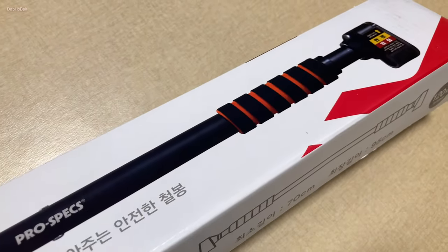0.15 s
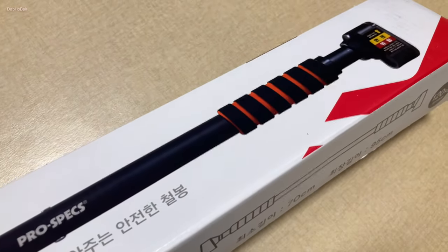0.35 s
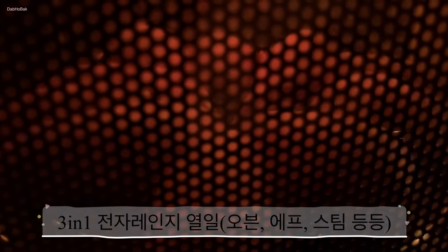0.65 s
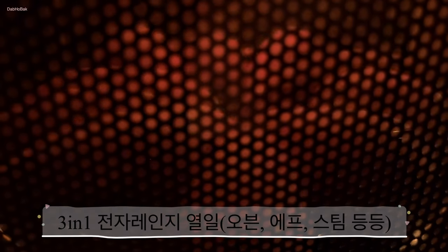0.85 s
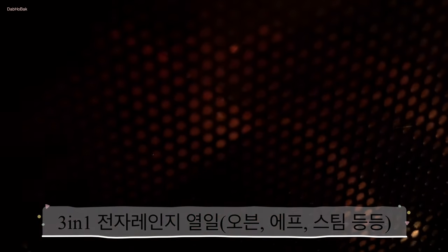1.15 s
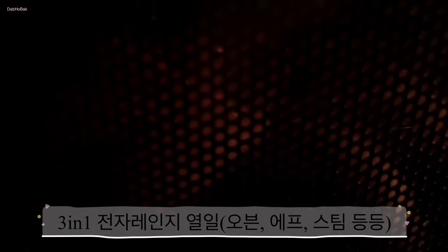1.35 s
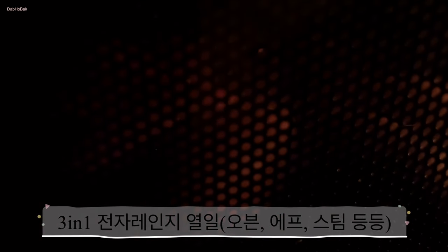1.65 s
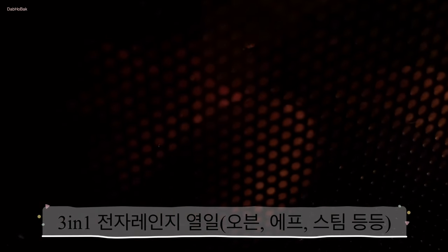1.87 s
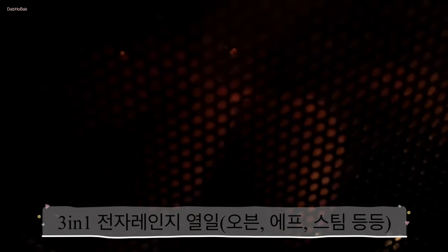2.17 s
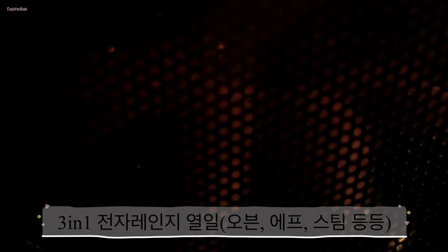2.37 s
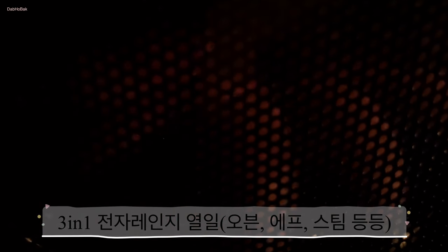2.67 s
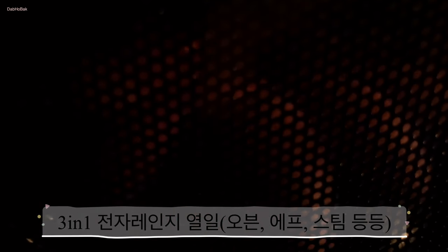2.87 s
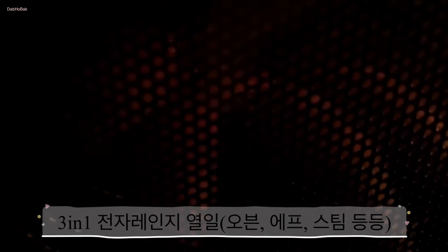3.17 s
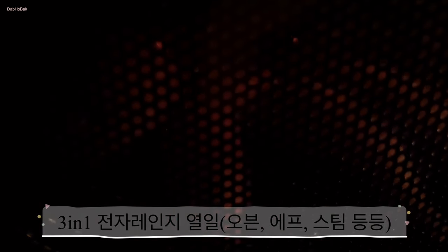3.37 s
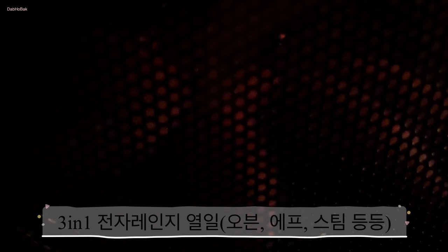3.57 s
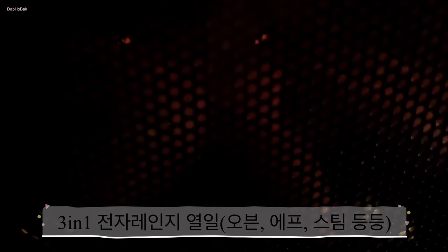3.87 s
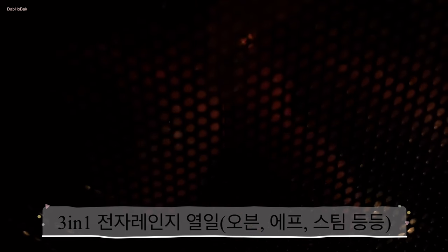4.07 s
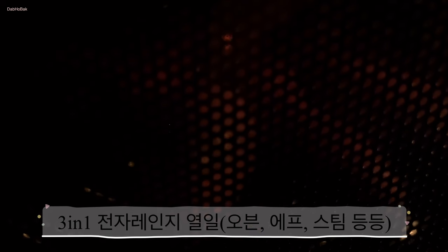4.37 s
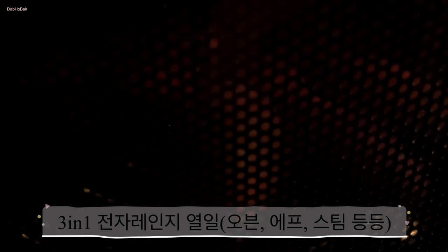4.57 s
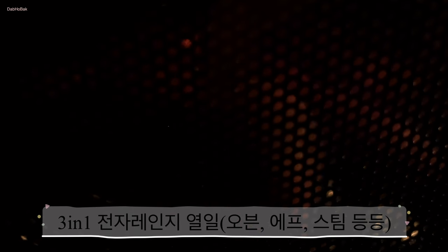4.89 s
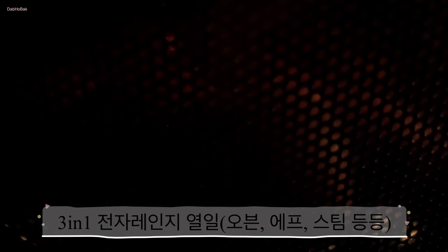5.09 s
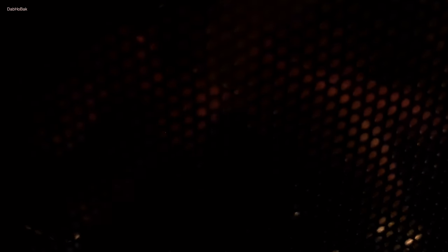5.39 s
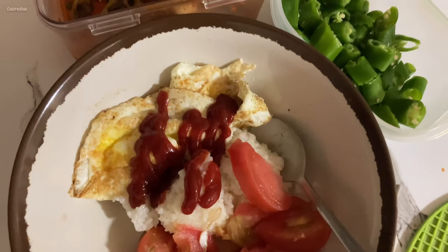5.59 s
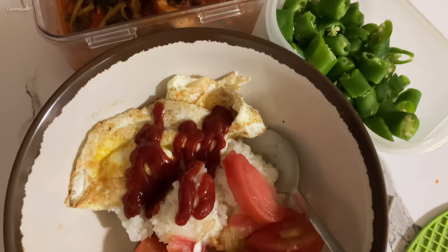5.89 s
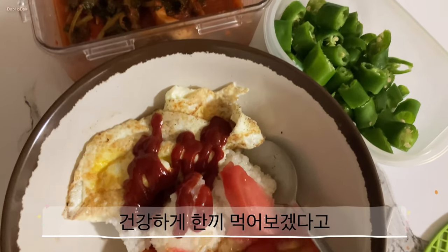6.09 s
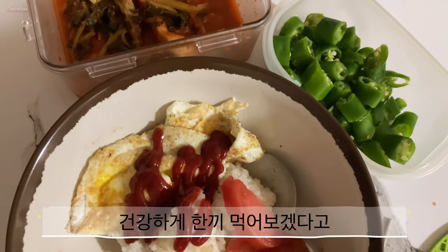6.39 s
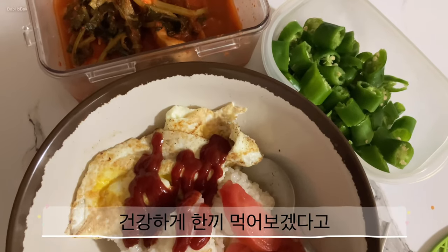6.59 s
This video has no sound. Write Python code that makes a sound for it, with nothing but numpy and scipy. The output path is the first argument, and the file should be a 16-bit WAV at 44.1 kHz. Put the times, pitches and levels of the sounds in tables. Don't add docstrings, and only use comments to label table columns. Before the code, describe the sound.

Bumps in a quiet room cut abruptly to a close, steadily humming oven fan with small fat spits, then to faint street noise and a distant horn.

```python
import sys
import numpy as np
from scipy import signal
from scipy.fft import rfft, irfft, next_fast_len
from scipy.io import wavfile
from scipy.ndimage import uniform_filter1d

SR = 44100
rng = np.random.default_rng(int(sys.argv[2]) if len(sys.argv) > 2 else 0)


def int16_out(signal):
    q = np.round(np.clip(np.atleast_2d(signal).T, -1, 1) * 32767)
    wavfile.write(sys.argv[1], SR, q.astype(np.int16))


def makeup_ratio(level_db):
    decades = np.asarray(level_db, float) / 20
    return 10 ** decades


N = 297234
T = np.arange(N) / SR

OVEN_IN, SETTLED, OVEN_OUT = .531746, .542721, 5.548413
UNSETTLED_DB = 12.5
# start_s, left_size, right_size, fade_s (negative builds up before the join)
JOIN_STEPS = [
    (OVEN_IN, -.21, -.265, .0004),
    (SETTLED, -.04, -.095, -.001),
    (OVEN_OUT, -.058, -.09, -.0015),
]
# pitch_hz, size
OPENING_KNOCK = [(110, .075), (365, 0.115), (580, -.03), (1000, 0.022)]

# pitch_hz, level_db
VENT_LOW = [(12, -68.5), (20, -29.5), (70, -11), (108, -11), (135, -5), (172, -9.5), (197, -22), (225, -12),
            (286, -12), (349, -8.5), (452, -19.5), (495, -12), (600, -21.5), (668, -30.5), (741, -23.5),
            (923, -18), (1510, -46), (1600, -30.5), (2080, -67.5), (3520, -120)]
# pitch_hz, level_db
VENT_HIGH = [(1400, -0.5), (1520, -7), (1800, -2), (2150, -7.5), (2400, -8.5), (4300, -21), (5500, -26.5),
             (7000, -25), (8300, -35.5), (9600, -37.5), (11000, -43), (13000, -47.5), (15000, -52.5),
             (16500, -61)]
# pitch_hz, width_hz, level_db
PANELS = [(97.4, 8, -3), (151, 18, -3), (219.7, 24, -11), (274, 18, -13.5), (564, 24, -25), (756, 17, -19),
          (1050, 60, -26), (1600, 60, -27.5), (2037, 55, -28), (2420, 50, -30.5), (2796, 30, -27.5),
          (164.2, 8, 1), (179.4, 4.6, -7.5), (323.5, 14, -4.5), (344.4, 14, -6.5), (364.6, 26, -4),
          (407.3, 16, -4), (434, 9, -9), (499, 11, -16), (779, 79, -14), (820, 14, -17.5), (950, 140, -21),
          (1352, 66, -21), (1758, 82, -18), (2300, 150, -20), (2840, 55, -34.5), (2950, 50, -37.5),
          (3130, 25, -31), (3420, 180, -29), (4140, 350, -33.5)]
FAN_DB, VENT_HIGH_DB, PANELS_DB = -33.5, -15.5, -3.5
RIPPLE_DB, RIPPLE_WIDTH_HZ, RIPPLE_FROM_HZ = .6, 20, 550
# multiple_of_hum, level_db
HUM = [(1, 0.5), (1.5, -23), (2, -19.5), (3, -13.5), (4, -18.5)]
HUM_HZ, HUM_DB = 120.1, -36
WHINE_HZ, WHINE_DB, WHINE_SAG_DB_PER_S = 15149, -91.5, 2.8
# pitch_hz, likeness, left_lag_rad
OVEN_LIKENESS = [(60, .7, .1), (130, .8, 0), (258, .7, -.1), (430, .83, .1), (520, .55, .5),
                 (600, .35, 1.5), (690, .3, 2.5), (775, .3, .4), (860, .5, -.3), (950, .56, -.1),
                 (1120, .5, .5), (1250, .4, -.5), (1380, .45, .3), (1550, .45, 1.9), (1890, .55, 1),
                 (2070, .25, -.5), (2325, .55, -1.6), (2580, .2, 0), (2840, .45, .2), (3445, .6, -.7),
                 (3875, .2, 1), (4306, .3, .1), (5167, .2, -1.3), (6029, .5, -1.9), (6890, .92, .1),
                 (7750, .8, 1.2), (8500, 1, 2.3), (15000, 1, 11.3)]

# start_s, peak_db, dullness_db,
# tail_db
SPITS = [(0.7562, -60, 5.5, -16), (0.9887, -44, 8.5, -11), (0.994, -46, 5, -16), (1.2136, -66, 11, -14),
         (1.3249, -53, 0, -15), (1.5888, -73, -4.5, -19), (1.7948, -63, -2, -16), (2.2837, -69, 4, -18),
         (2.9083, -66, 4, -14), (3.4775, -66.5, 9.5, -13), (4.5494, -73, -1, -16), (5.1647, -77, 17, -16),
         (5.4291, -43, 2, -27)]
# pitch_hz, level_db
SPIT_COLOUR = [(1500, -14.5), (2600, -1.5), (3600, -6.5), (4200, -5), (5200, -9), (6700, -5.5),
               (8400, -14.5), (9500, -25), (11000, -5), (12500, -15), (14000, -12), (15500, -23),
               (16000, -30.5), (16500, -52)]
# pitch_hz, likeness
SPIT_LIKENESS = [(1500, -.3), (2300, .4), (3400, -.2), (4400, -.3), (5800, .2), (7000, .3), (8000, .3),
                 (9500, -.5), (11500, .2), (15000, -.3)]
BURST_S, BURST_S_PER_DB, HARD_DB, SPIT_TAIL_S = .0056, .0001, -58, .034
# start_s, peak_db
RELAY_SNAPS = [
    (1.3249, -38.5),
    (5.4292, -34),
]
# pitch_hz, level_db, time_to_fall_60_db_s, phase_between_microphones_rad
BRACKET = [(1760, 5, .02, 1.5), (2250, 0, .016, 1.6), (3000, -7, .01, 1.3), (4160, 0, .016, 1.8),
           (5600, -7, .012, 1.5), (7100, -6, .013, 1.6), (7710, -1, .016, 1.9), (8300, -2, .012, 2.3),
           (10400, -6, .013, 2.2), (11600, -1, .014, 1.2), (12100, -8, .02, 1.2), (13000, -11, .012, 1.3),
           (15300, -11, .014, 1.3)]

# start_s, peak_size, peak_delay_s, turns_per_e_fold_of_time, narrowness
TAPS = [
    (.1024, -.29, .0204, 1.84, 5.1),
    (.1022, .064, .0091, 2.5, 6.5),
    (5.3931, -.28, .0069, 1.27, 1.4),
    (.171, .007, .01, 1.3, 1.3),
    (.365, .012, .011, 1.45, 1.6),
    (.446, .0035, .003, 1.2, .4),
    (5.878, .018, .018, 1.6, 1.2),
    (5.938, .012, .016, 1.5, 1.2),
    (5.996, .012, .018, 1.5, 1.2),
]
# start_s, peak_size, peak_delay_s, pitch_hz, narrowness
THUDS = [(.07, .028, .024, 48, 1.2), (.13, .02, .019, 45, 2), (5.3947, -.17, .0026, 7, .17),
         (5.4098, -.072, .0139, 26, .87), (5.4021, .115, .0032, 47, .053), (.4675, -.13, .0216, 37, 2.2),
         (.4881, -.032, .0262, 45, .86), (.4925, .08, .0148, 30, .88), (.378, -.08, .017, 62, 2.0),
         (.398, -.035, .016, 30, 1.5), (2.37, .015, .018, 50, 1.5), (2.93, .018, .018, 50, 1.5),
         (3.06, .013, .02, 60, 1.5), (3.27, .016, .018, 48, 1.5), (4.41, .01, .025, 42, 1.5),
         (4.7, .011, .018, 50, 1.5), (5.445, -.05, .022, 45, 1), (5.5, -.075, .024, 37, 1.5),
         (5.83, .008, .016, 60, 1.5), (5.78, .006, .02, 325, .4), (5.83, .005, .02, 350, .6),
         (5.88, .004, .03, 320, .4), (6.255, .003, .015, 740, 1), (6.3, .003, .015, 830, 1),
         (6.565, .0025, .015, 750, 1), (6.26, .003, .015, 355, 1), (6.01, .003, .015, 440, 1),
         (5.6, .002, .02, 830, .5), (6.1, .006, .02, 95, 1), (5.59, .006, .02, 100, .5)]
THUD_TURNS = .32
BUMP_LAG_S, BUMP_STRETCH = .0002, 1.045
# start_s, peak_db, pitch_hz, decay_s
TICKS = [(.1022, -46, 620, .002), (.1022, -57, 1350, .001), (.171, -60, 950, .0015),
         (.363, -42.5, 1234, .0034), (.3635, -54, 1980, .002), (.363, -52, 4500, .0012),
         (.3635, -56, 3300, .0008), (.4462, -47, 2200, .0003), (.4468, -49, 1000, .0012),
         (.477, -49, 900, .0015), (.4895, -55, 1300, .001), (.489, -54, 700, .003), (.502, -56, 700, .002),
         (5.3932, -45, 5300, .0007), (5.3935, -34, 800, .001), (6.2035, -52, 686, .003)]
RUB_AT_S, RUB_HZ, RUB_DB, RUB_S = .363, (2480, 6440), -59, .033

# pitch_hz, level_db
ROOM_HISS = [(250, -1.5), (400, -18.5), (600, -7), (1000, -11), (2000, -17.5), (3500, -21.5), (5000, -24),
             (7000, -26), (9000, -24), (11000, -25), (12500, -27), (14000, -34), (15000, -33.7),
             (16000, -40)]
# pitch_hz, likeness
ROOM_LIKENESS = [(60, 0.93), (400, 0.79), (700, 0.84), (1200, -0.3), (2000, 0.17), (3500, 0.22),
                 (6000, 0.09), (8000, -0.8), (11000, -1.3), (15000, -.8)]
ROOM_DB, ROOM_WHINE_HZ, ROOM_WHINE_DB = -64.5, 15267, -89
# pitch_hz, level_db
GRIP = [(20, -25.0), (50, 7.5), (100, -0.5), (250, -16.5), (500, -37.0), (1000, -45), (2000, -81)]
GRIP_DB, GRIP_FADE_DB_PER_S, GRIP_STILL_S = -38, 56, .24

# pitch_hz, level_db
STREET = [(15, -42), (30, -20), (85, 1.5), (170, -4.5), (210, -3.5), (250, -6.5), (300, -5.5), (500, -9.5),
          (750, -10.5), (1020, -14), (2300, -24), (3300, -32), (4600, -38), (5600, -47), (7800, -50),
          (9200, -50), (11000, -54), (14000, -60), (15600, -60), (16300, -85)]
# pitch_hz, likeness
STREET_LIKENESS = [(60, 0.96), (400, 0.52), (750, 0.3), (1300, -0.29), (2000, 0.18), (3500, 0.36),
                   (6000, 0.057), (8000, -0.23), (11000, -0.65), (15000, -.7)]
# pitch_hz, width_hz, level_over_street_db
TABLE_ROOM = [(337, 42, 3), (545, 13, 10), (684, 16, 1), (818, 12, 10.5), (1613, 26, 7)]
STREET_DB = -46.5
# multiple_of_pitch, level_db
HORN_TONE = [(1, 5), (2, -13), (3, -20), (4, -30)]
HORN_HZ, HORN_DB, HORN_SAG_DB_PER_S = 375, -51.5, 4
HORN_S, HORN_ATTACK_S, HORN_HOLD_S, HORN_RELEASE_S = 6.425, .064, .182, .027

# pitch_hz, left_minus_right_db
LEFT_COLOUR = [(100, -0.9), (300, 0), (600, 2), (800, -1), (1250, 2.5), (2800, 0), (16000, -1)]
MICROPHONE_LAG_S = .00022
TOP_HZ, TOP_TAPS = 16500, 121


def unit(x):
    return x / np.sqrt(np.mean(x ** 2))


def shape(table, hz):
    pitch, db = np.array(table)[:, 0], np.array(table)[:, 1]
    return makeup_ratio(np.interp(np.log(hz + 1), np.log(pitch + 1.), db))


def walk(rate):
    k = int(SR / rate)
    held = np.repeat(rng.standard_normal(N // k + 1), k)
    return 1.3 * uniform_filter1d(uniform_filter1d(held, k), k)[:N]


def ports(gain, likeness):
    size = next_fast_len(N)
    hz, table = np.fft.rfftfreq(size, 1 / SR), np.array(likeness).T
    shared, own = gain(hz) * rfft(rng.standard_normal((2, size)))
    like = np.clip(np.interp(np.log(hz + 1), np.log(table[0]), table[1]), -1, 1)
    if len(table) > 2:
        lag = np.interp(hz, table[0], table[2])
    else:
        lag = 2 * np.pi * hz * MICROPHONE_LAG_S
    left = shared * np.exp(-1j * lag)
    right = like * shared + np.sqrt(1 - like ** 2) * own
    return hz, np.array([left, right])


def air(gain, likeness, flicker_db):
    hz, pair = ports(gain, likeness)
    octaves = np.log2(np.clip(hz, 2 ** 5, 2 ** 14))
    out = 0
    for octave in range(5, 15):
        band = np.clip(1 - np.abs(octaves - octave), 0, 1)
        noise = irfft(band * pair, next_fast_len(N))[:, :N]
        out = out + noise * makeup_ratio(flicker_db * walk(7))
    return unit(out)


def tones(hz, table, wobble_db):
    out = 0
    for multiple, db in table:
        level = np.sqrt(2) * makeup_ratio(db + wobble_db * walk(11))
        out = out + level * np.sin(2 * np.pi * (multiple * hz * T + rng.random()))
    return out


def quiet_room():
    grip = air(lambda hz: shape(GRIP, hz), ROOM_LIKENESS, flicker_db=-3.0)
    grip = grip * makeup_ratio(GRIP_DB - GRIP_FADE_DB_PER_S * np.minimum(T, GRIP_STILL_S))
    hiss = air(lambda hz: shape(ROOM_HISS, hz) * (hz > 200), ROOM_LIKENESS, flicker_db=-2.0)
    whine = tones(ROOM_WHINE_HZ, [(1, 0)], wobble_db=.5)
    return grip + makeup_ratio(ROOM_DB) * hiss + makeup_ratio(ROOM_WHINE_DB) * whine


def street():
    def colour(hz):
        hollow = sum(makeup_ratio(db) / (1 + (2 * (hz - f) / width) ** 2) for f, width, db in TABLE_ROOM)
        return shape(STREET, hz) * (hz > 22) * (1 + hollow / 2)
    return makeup_ratio(STREET_DB) * air(colour, STREET_LIKENESS, flicker_db=1.5)


def horn():
    t = T - HORN_S
    end = HORN_ATTACK_S + HORN_HOLD_S + HORN_RELEASE_S
    press = np.clip(np.minimum(t / HORN_ATTACK_S, (end - t) / HORN_RELEASE_S), 0, 1)
    level = makeup_ratio(HORN_DB - HORN_SAG_DB_PER_S * np.clip(t, 0, end))
    return press * level * tones(HORN_HZ, HORN_TONE, wobble_db=-6.0)


def bumps():
    out = np.zeros((2, N))
    rows = [(row, row[3], 0) for row in TAPS] + [(row, THUD_TURNS, row[3]) for row in THUDS]
    for (s, size, peak, _, narrow), fold, hz in rows:
        i = int(s * SR)
        since = np.maximum(T[:SR // 5] - np.array([[BUMP_LAG_S], [0]]), 1e-6)
        stretch = np.array([[BUMP_STRETCH if hz < 100 else 1], [1]])
        u = since / peak / stretch
        turns = fold * np.log(u) + hz * peak * (u - 1)
        swell = (u * np.exp((1 - u ** 2) / 2)) ** narrow
        swell = swell * np.minimum(u * peak / .0017, 1) ** 2
        out[:, i:i + SR // 5] += (size * swell * np.cos(2 * np.pi * turns))[:, :N - i]
    return out


def ticks():
    out = np.zeros((2, N))
    t = T[:SR // 8]
    rub_band = signal.butter(2, RUB_HZ, "band", fs=SR, output="sos")
    for s, db, hz, decay in TICKS:
        i = int(s * SR)
        soft = signal.butter(2, 1.5 * hz, fs=SR, output="sos")
        crumb = .5 * signal.sosfilt(soft, rng.standard_normal((2, len(t))))
        out[:, i:i + len(t)] += makeup_ratio(db) * np.exp(-t / decay) * (np.sin(2 * np.pi * hz * t) + crumb)
        if abs(s - RUB_AT_S) < .001:
            rub = signal.sosfilt(rub_band, rng.standard_normal((2, len(t))))
            out[:, i:i + len(t)] += makeup_ratio(RUB_DB) * np.exp(-t / RUB_S) * rub
    return out


def relay():
    out = np.zeros((2, N))
    t = T[:SR // 20]
    ring = 0
    for hz, db, t60, apart in BRACKET:
        phase = np.array([[0], [apart]])
        ring = ring + makeup_ratio(db - 60 * t / t60) * np.sin(2 * np.pi * hz * t + phase)
    ring = ring * np.minimum(t / .0005, 1)
    for s, db in RELAY_SNAPS:
        i = int(s * SR)
        out[:, i:i + len(t)] += makeup_ratio(db) * ring
    return out


def spits():
    hz, hiss = ports(lambda hz: shape(SPIT_COLOUR, hz), SPIT_LIKENESS)
    bright = unit(irfft(hiss * (hz > 8900), next_fast_len(N))[:, :N])
    dull = unit(irfft(hiss * (hz <= 8900), next_fast_len(N))[:, :N])
    bright_level, dull_level, t = np.zeros(N), np.zeros(N), T[:SR // 4]
    for s, db, dull_db, tail_db in SPITS:
        i = int(s * SR)
        burst_s = BURST_S - BURST_S_PER_DB * max(db - HARD_DB, 0)
        fade = np.exp(-(t / burst_s) ** 2) + makeup_ratio(tail_db) * np.exp(-t / SPIT_TAIL_S)
        fade = fade * np.minimum(t / .00021, 1) * makeup_ratio(db - 2.5)
        bright_level[i:][:len(t)] += fade
        dull_level[i:][:len(t)] += fade * makeup_ratio(dull_db)
    return bright_level * bright + dull_level * dull


def fan():
    def colour(hz):
        panels = 0
        for f, width, db in PANELS:
            panels = panels + makeup_ratio(db) ** 2 / width / (1 + (2 * (hz - f) / width) ** 2) ** 2
        low = shape(VENT_LOW, hz) ** 2 / 400
        high = (makeup_ratio(VENT_HIGH_DB) * shape(VENT_HIGH, hz)) ** 2 / 4000
        bins = int(RIPPLE_WIDTH_HZ / hz[1])
        rough = rng.standard_normal(len(hz))
        ripple = unit(uniform_filter1d(uniform_filter1d(rough, bins), bins))
        power = low + high + makeup_ratio(PANELS_DB) ** 2 * panels / 10
        return makeup_ratio(RIPPLE_DB * ripple * (hz > RIPPLE_FROM_HZ)) * np.sqrt(power)
    return makeup_ratio(FAN_DB) * air(colour, OVEN_LIKENESS, flicker_db=.7)


def oven():
    sides = makeup_ratio(np.array([[-.3], [.3]]))
    hum = makeup_ratio(HUM_DB) * tones(HUM_HZ, HUM, wobble_db=2.0) * sides
    whine = makeup_ratio(WHINE_DB - WHINE_SAG_DB_PER_S * T) * tones(WHINE_HZ, [(1, 0)], wobble_db=.5)
    return fan() + hum + whine + spits() + relay()


def join_clicks(parts):
    out = 0
    for s, left, right, fade in JOIN_STEPS:
        i = int(np.ceil(s * SR))
        gap = np.array([left, right]) - np.sign(fade) * (parts[:, i] - parts[:, i - 1])
        side = np.where(fade > 0, T >= s, T < s)
        out = out + gap[:, None] * side * np.exp(-np.abs((T - s) / fade))
    return out


def scene():
    running = oven()
    opening = (T >= OVEN_IN) & (T < SETTLED)
    knock = sum(-size * np.cos(2 * np.pi * hz * (T - OVEN_IN)) for hz, size in OPENING_KNOCK)
    rattle = signal.sosfilt(signal.butter(2, 500, "high", fs=SR, output="sos"), running)
    running = running + (makeup_ratio(UNSETTLED_DB) * rattle + knock) * opening
    at_table = street() + horn()
    parts = np.where(T < OVEN_IN, quiet_room(), np.where(T < OVEN_OUT, running, at_table))
    cut_short = ((T >= OVEN_IN) & (T < 1)) | ((T >= OVEN_OUT) & (T < OVEN_OUT + .2))
    parts = parts + (bumps() + ticks()) * ~cut_short
    return parts + join_clicks(parts)


def band_limit(x):
    return signal.sosfilt(signal.butter(12, 16990, fs=SR, output="sos"), x)


def record(dry):
    tilt = np.sqrt(shape(LEFT_COLOUR, np.fft.rfftfreq(N, 1 / SR)))
    heard = irfft(rfft(dry) * np.array([tilt, 1 / tilt]), N)
    heard = heard * np.minimum(T / .0019, 1)
    top_cut = signal.firwin(TOP_TAPS, TOP_HZ, fs=SR)
    mix = signal.fftconvolve(heard, top_cut[None], "same")
    return band_limit(mix)


dry = scene()
out = record(dry)
int16_out(out)
```